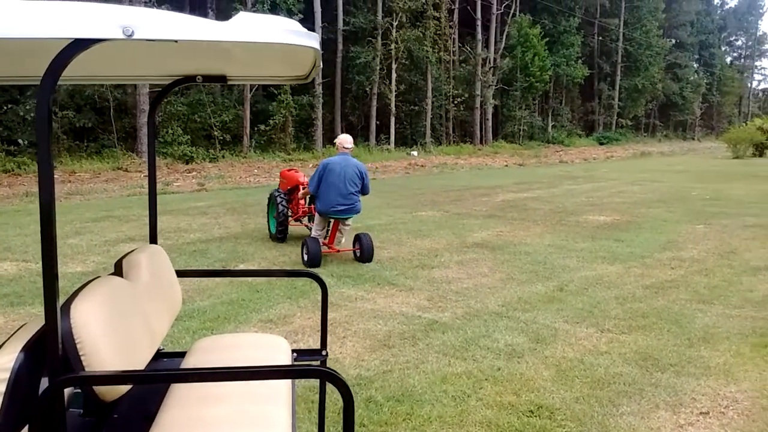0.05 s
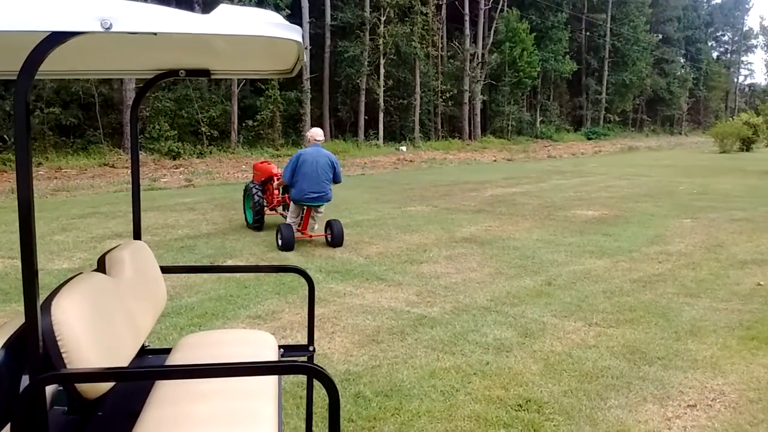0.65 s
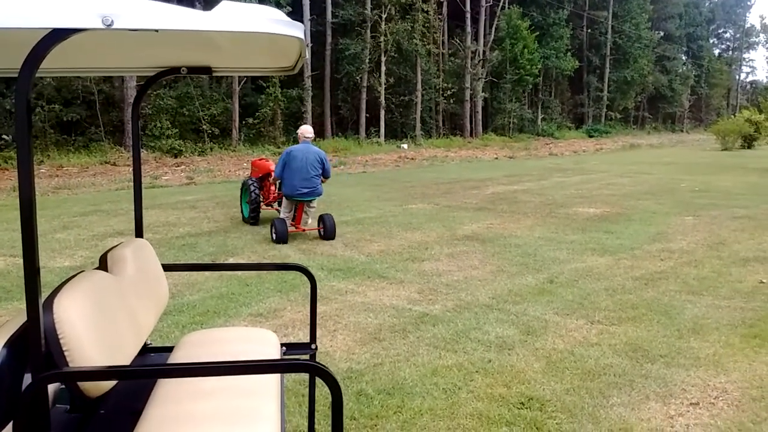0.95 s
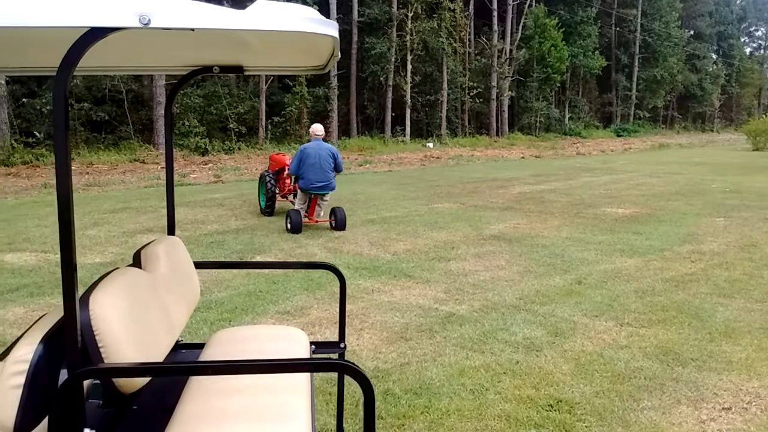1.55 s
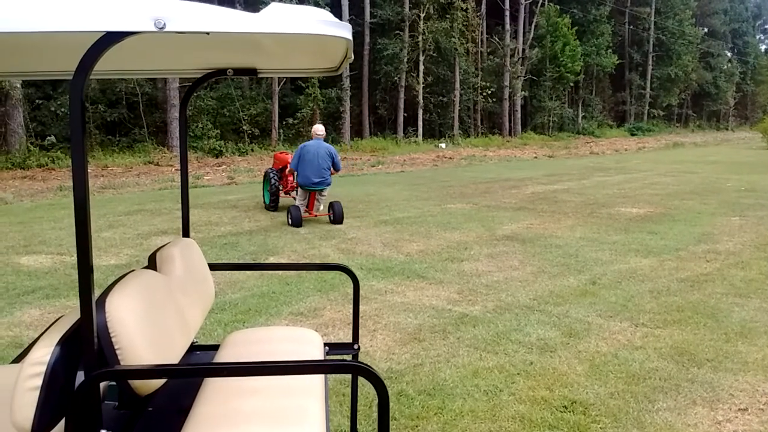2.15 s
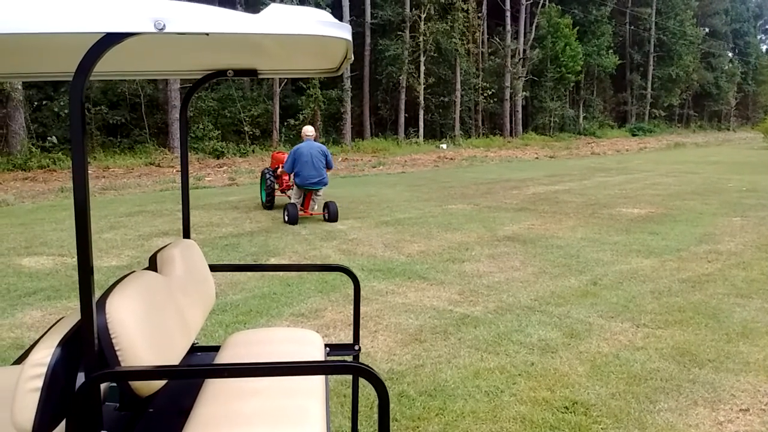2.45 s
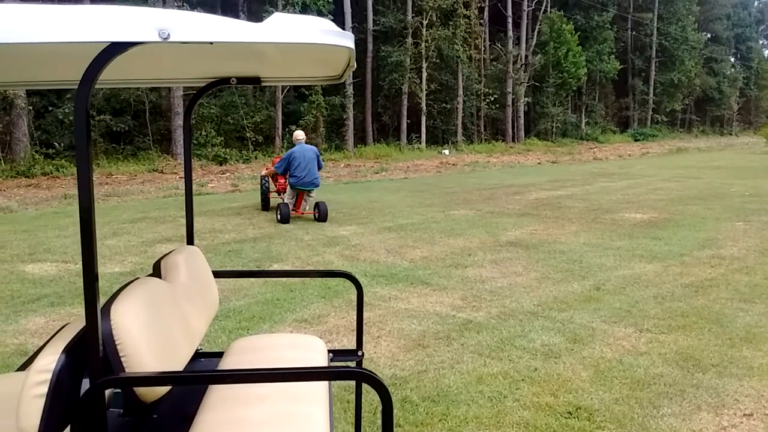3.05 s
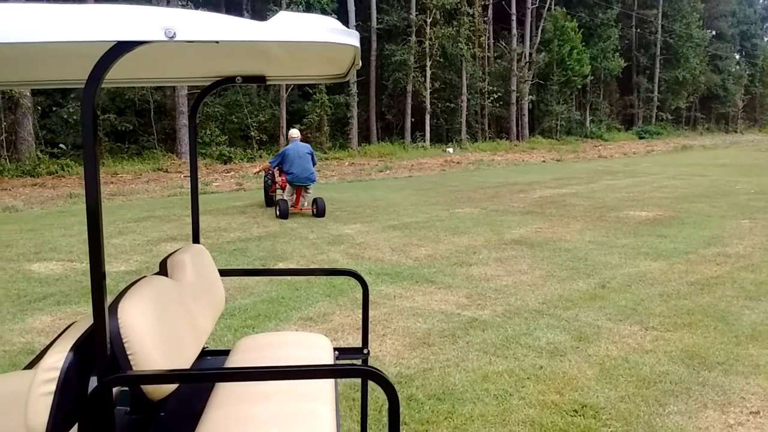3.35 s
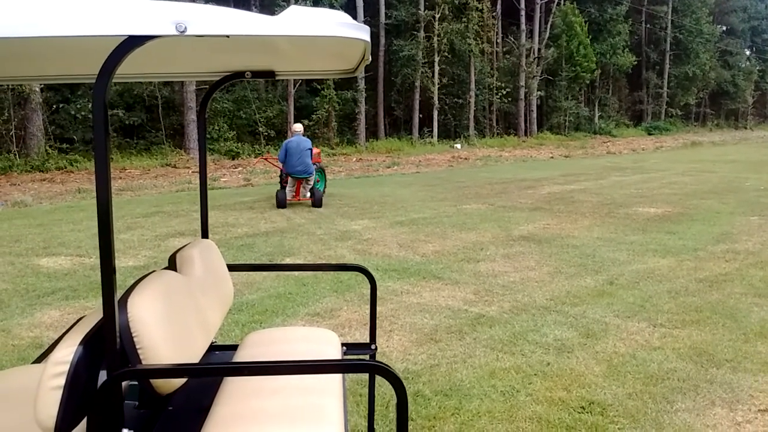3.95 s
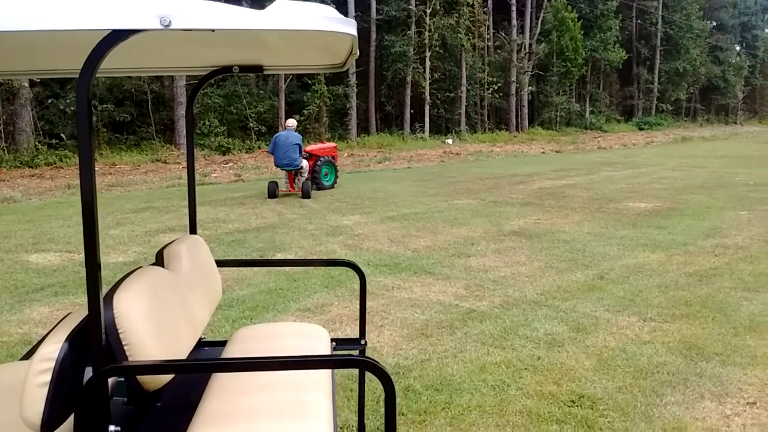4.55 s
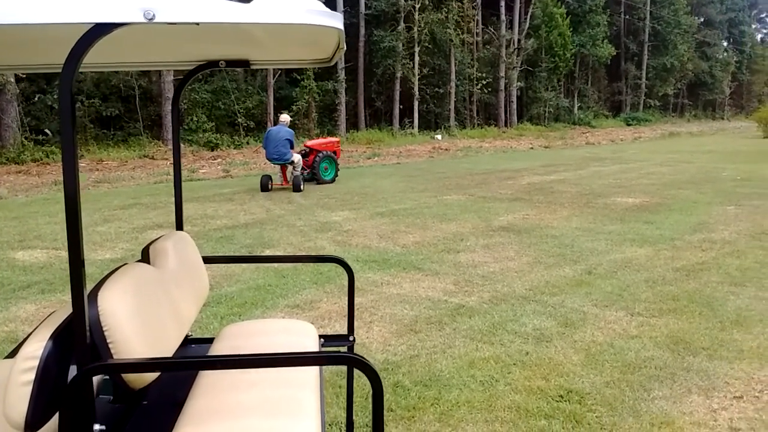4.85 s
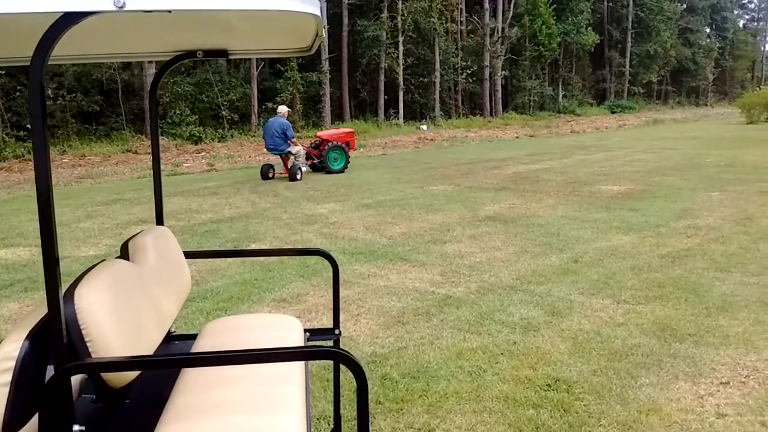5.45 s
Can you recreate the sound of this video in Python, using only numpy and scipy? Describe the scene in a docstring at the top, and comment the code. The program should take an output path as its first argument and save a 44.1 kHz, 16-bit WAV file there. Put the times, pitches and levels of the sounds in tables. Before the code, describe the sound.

The fast, even putter of a small tractor engine runs throughout, low thumps mixed with crisp puffs of exhaust. A fan and gears whir underneath, and sheet metal clinks now and then. The engine speed barely changes, though the tone alters slightly as the machine turns late on. The setting is a grassy field, with a soft wind rumble on the microphone and a dull, faint echo from the woods.

```python
"""Garden tractor on a lawn

A one-cylinder four-stroke chugs away and turns side-on. Each firing sends a thump out of the
muffler, knocks its shell and spits gas in a sharp burst and a softer puff; some jolt loose panels.
Fan and gears whir and rattle underneath. Trees echo faintly and a light breeze rumbles.
The two microphone ports are in opposite polarity in the bass."""
import sys
import numpy as np
from scipy import signal
from scipy.fft import rfft, irfft, next_fast_len
from scipy.io import wavfile

SR = 44100
rng = np.random.default_rng(int(sys.argv[2]) if len(sys.argv) > 2 else 0)


def to_wav(sig):
    """Store sig (one row per channel, or 1-D mono) as 16-bit WAV at the path in sys.argv[1].

    Samples outside -1..1 are clipped; the rate is SR.
    """
    pcm = np.clip(np.atleast_2d(sig), -1, 1) * 32767
    pcm = np.round(pcm).astype(np.int16)
    wavfile.write(sys.argv[1], SR, pcm.T)  # frames by channels


N = 246953
NFFT = next_fast_len(N + SR // 2)
TIME_S = np.arange(N) / SR
FREQ_HZ = np.maximum(np.arange(NFFT // 2 + 1) * SR / NFFT, 1)

# governed engine speed: t/s, firing rate/Hz
FIRING_RATE = [(0.0, 22.055), (0.36, 22.441), (0.76, 21.656), (0.96, 22.715), (1.16, 22.569),
               (1.42, 23.068), (1.74, 22.12), (1.92, 22.599), (2.14, 22.384), (2.5, 23.002), (2.74, 22.436),
               (2.92, 22.516), (3.34, 21.997), (4.0, 23.008), (4.52, 22.908), (4.8, 23.408), (4.94, 22.831),
               (5.6, 22.834)]
# tractor heading: t/s, view (0 from behind, 1 side-on)
HEADING = [(3.5, 0), (4.25, 1)]
# engine pull as the governor opens and closes: t/s, effort/dB
EFFORT = [(0.0, 0.1), (0.6, -0.1), (0.73, -3.0), (0.9, -2.8), (1.37, 1.8), (1.47, -0.8), (2.3, 0.3),
          (2.4, 2.4), (2.83, -0.8), (3.63, 2.4), (4.07, 0.9), (4.33, -2.7), (4.5, -1.0), (4.6, -2.0),
          (4.7, 0.9), (4.9, -3.5), (5.2, 1.7), (5.6, 1.3)]
# exhaust hiss beyond effort: t/s, level/dB
HISS = [(0.0, 0.9), (0.1, 3.5), (1.3, -0.8), (1.4, 1.2), (1.73, 0.0), (1.84, 2.9), (2.27, -0.5),
        (2.53, 1.4), (2.8, -1.5), (2.9, 0.6), (3.0, -2.4), (3.18, -0.8), (3.4, -2.4), (4.3, -2.2),
        (4.8, -.2), (5.6, 0.8)]
# by part: offset/dB, effort slope/(dB/dB), hiss slope/(dB/dB), drift/(dB/s), side-on gain/dB
DRIVE_RESPONSE = {"thump": (.4, .75, -.1, .4, -1.5), "knock": (-.1, 1.05, -.1, .15, -.4),
                  "spit": (-1.6, -.2, 1.4, .2, .4), "whistle": (.1, .2, .7, .1, -.3),
                  "puff": (-.7, .7, .5, .1, .3), "whir": (-.5, .65, .35, -.1, .7)}
# gears taking up load: t/s, level/dB
GEAR_LOAD = [(0, -.2), (.8, -.6), (2.2, -.3), (2.4, .8), (2.8, -.6), (3.3, -.5), (3.55, .8), (3.9, 2.3),
             (4.3, .3), (5.0, .4), (5.35, 1.7), (5.6, .5)]
# fan and gear spectrum: f/Hz, rear level/dB, side-on level/dB
WHIR_SPECTRUM = [(30, -24.4, -22.0), (150, -16.5, -11.6), (400, -26.5, -20.5), (700, -26, -25),
                 (1250, -28.2, -28.0), (1650, -27.3, -27.3), (2600, -29.7, -28.3), (3500, -27.1, -29.5),
                 (4600, -34.5, -35.0), (6700, -35.7, -39.0), (8200, -34.4, -37.7), (9600, -41, -42),
                 (11500, -43.5, -47), (14000, -54, -57), (16000, -66.1, -65.7)]
# gear and chassis rattle spectrum: f/Hz, rear level/dB, side-on level/dB
RATTLE_SPECTRUM = [(400, -38, -40), (1300, -21, -21.5), (2300, -21, -20.5), (3300, -29, -29),
                   (4000, -24, -24), (4400, -23, -19), (4900, -29, -26), (6500, -35, -33), (8400, -29, -28),
                   (11000, -34, -33), (16000, -57, -56)]
# muffler and pipe modes: f/Hz, t60/s, level/dB
MUFFLER_MODES = [(298, .08, -31), (345, .05, -31), (390, .03, -28), (510, .04, -27), (560, .04, -32),
                 (618, .05, -32), (772, .06, -39), (895, .045, -32), (965, .04, -38), (1065, .06, -34),
                 (1150, .007, -30.5), (1258, .07, -45), (1550, .07, -42), (1672, .07, -40),
                 (2245, .06, -43)]
# drop in the whistle: t/s, level/dB
WHISTLE_FADE = [(2.55, .8), (2.68, -4.8)]
# valve burst spectrum: f/Hz, rear level/dB, side-on level/dB
SPIT_SPECTRUM = [(700, -22.1, -21.0), (1600, -18.5, -16.5), (2400, -13.1, -17.5), (3200, -12.8, -8.8),
                 (3800, -12, -13.1), (4600, -17.5, -17.5), (5700, -18.7, -18.4), (6600, -27.5, -20),
                 (7400, -20.3, -20.4), (9700, -26.5, -24.2), (11000, -25.7, -23.2), (12500, -35.1, -32.4),
                 (14000, -36.5, -37), (16000, -52, -47)]
# treble flare in the turn: t/s, level/dB
TREBLE_FLARE = [(0, -45), (3.7, -40), (3.9, -21.5), (4.15, -17.5), (4.33, -24), (4.47, -22), (4.72, -22),
                (4.95, -33), (5.6, -32)]
# harder firings: t/s, extra spit/dB, extra whistle/dB
HARD_FIRINGS = [(.05, 2, 2), (.095, 2, 2), (.32, 1, 4.5), (.364, 1, 4), (.41, 1, 5), (.453, 1, 5),
                (.635, 1.5, -1), (.68, 2.5, .5), (.863, 1.5, 4), (.997, 1.5, 5), (1.13, 2, 4.5),
                (1.174, 1.5, 4), (1.437, 4, 5), (1.613, 1, 2), (1.926, 1, 4.5), (2.455, 1, 3.5),
                (1.97, 1, 4), (2.013, 1.5, 3), (2.41, 1, 4.5), (2.544, 2, 5), (3.121, 1, 5), (3.483, 1, 5),
                (3.528, 3, 1), (3.969, 2, 3), (4.143, 1, 5), (4.187, 3, 7), (4.23, -1, 5), (4.534, 3, 1),
                (4.837, 6, 3), (5.319, 2.5, 4)]
# exhaust pulse spectrum: f/Hz, rear level/dB, side-on level/dB
THUMP_SPECTRUM = [(22, 8.4, 10.3), (45, 17.5, 20.1), (66, 13.5, 15.8), (90, 32.5, 30.6), (113, 37.8, 35.3),
                  (158, 37.7, 39.9), (204, 34.1, 38.2), (228, 30.5, 33.6), (255, 18.8, 22.6), (330, 0, 0)]
# muffler chambers: f/Hz, width/Hz, share (negative opposes the thump)
CHAMBERS = [(96, 40, .14), (178, 24, -.22)]
# exhaust stroke spectrum: f/Hz, rear level/dB, side-on level/dB
PUFF_SPECTRUM = [(300, -32.3, -32.3), (500, -21.0, -21.6), (900, -23.0, -21.1), (1300, -22.7, -20.9),
                 (1650, -18.6, -17.9), (2700, -20.2, -20.5), (3600, -19.4, -16.9), (4600, -26.6, -23.1),
                 (6800, -33.0, -26.9), (8200, -19.6, -22.7), (9600, -32.8, -28.5), (11000, -33.5, -31.6),
                 (14500, -44.7, -42.8), (16000, -59.4, -49.6)]
# sheet metal clanks: t/s, level/dB, f/Hz, width/Hz
CLANKS = [(.051, -9, 3690, 250), (.096, -4, 3730, 280), (.23, -10, 3370, 350), (.636, -12, 4700, 1150),
          (.681, -13, 4700, 1150), (.682, -7, 3600, 200), (1.395, -15, 3000, 700), (1.438, -12, 3330, 200),
          (1.838, -11, 4300, 800), (1.883, -15, 3000, 900), (2.06, -11, 3400, 300), (2.195, -15, 4200, 700),
          (2.283, -14, 3000, 150), (2.414, -13, 2480, 150), (2.502, -13, 2480, 150),
          (2.545, -11, 2890, 400), (2.856, -15, 4400, 300), (2.9, -15, 4350, 300), (3.078, -10, 3000, 130),
          (3.215, -12, 4450, 130), (3.258, -12, 4450, 160), (3.35, -15, 4400, 300), (4.45, -13, 4350, 110),
          (4.536, -10, 4400, 150), (4.58, -11, 4400, 100), (4.668, -12, 3400, 350), (4.711, -11, 3690, 200),
          (4.796, -13, 3090, 180), (4.839, -8, 3730, 250), (4.883, -11, 3090, 160), (5.057, -9, 3650, 300),
          (5.101, -12, 3370, 200), (5.145, -13, 3330, 200), (5.275, -16, 3400, 900), (5.32, -13, 3170, 200),
          (5.364, -11, 3130, 200), (5.408, -14, 4400, 900), (5.497, -13, 4800, 1150),
          (5.54, -16, 4400, 1150)]
# hood and casing resonances: f/Hz, width/Hz, lift/dB in views 0, 1, 2
CASING_MODES = [(770, 40, 5.5, 6, 3), (905, 70, 4.5, 5, 3), (1075, 70, .5, 4, 5.5), (1262, 45, 7, 4, 5),
                (1555, 60, 4, 6, 3), (1676, 55, 5.5, 6.5, 6.5), (1900, 200, -1, .3, 2), (2245, 70, 3, 4, 1),
                (2400, 160, 4.5, 4.5, 3.5), (2680, 150, -4, -.5, 2.5), (2940, 150, 5, 3, 3),
                (3200, 300, 1.5, 2, 4.5), (3550, 250, 3, 2, 1.5), (3860, 160, 5, 1, 2.5),
                (4100, 150, -3, -.5, -2.5), (4420, 260, .3, 2, 1.5), (4750, 200, 2.3, 1, -.5),
                (5650, 350, 3, 3, 3), (6200, 300, -.3, -2.5, 1.5), (6750, 450, -.3, 2.5, 2),
                (7500, 600, -3, -.3, 2), (8880, 300, 2.5, 3, 2.5), (9600, 800, -4, .3, 1.5),
                (10900, 900, 3, 3, 2.5)]
# heading for the casing's ring: t/s, view (0 angled left, 1 straight away, 2 side-on)
CASING_VIEW = [(2.55, 0), (2.75, 1), (3.75, 1), (4.2, 2)]
# microphone ports, tractor from behind: f/Hz, left minus right/dB, left lead/rad, coherence
PORTS_BEHIND = [(60, 0.9, 3.1, 0.999), (250, 0.5, 3.1, 0.998), (420, 0.0, 3.15, 0.994),
                (600, -0.3, 3.06, 0.98), (770, -4.2, 3.22, 0.91), (1080, -3.8, 3.05, 0.8),
                (1260, -7.8, 5.82, 0.66), (1650, 2.0, 5.62, 0.87), (2000, 5.4, 5.03, 0.49),
                (2250, 9.0, 4.62, 0.54), (2850, 3.6, 3.36, 0.88), (3350, 0.4, 3.22, 0.96),
                (3700, -3.0, 3.23, 0.86), (3920, -9.2, 2.0, 0.54), (4300, -0.4, -0.07, 0.78),
                (4800, 3.9, -0.26, 0.78), (5300, 4.5, -0.61, 0.31), (5750, 6.9, -1.22, 0.61),
                (6500, 0.2, -2.9, 0.76), (7100, -4.6, -1.57, 0.27), (7800, -5.0, -0.19, 0.78),
                (8700, -2.8, -0.05, 0.83), (9500, -0.8, -2.58, 0.12), (10400, -4.4, -5.52, 0.07),
                (11000, -2.8, -4.24, 0.66), (12000, -0.6, -6.6, 0.26), (12600, 0.1, -6.34, 0.89),
                (15000, 1.2, -6.18, 0.33)]
# microphone ports, tractor side-on: f/Hz, left minus right/dB, left lead/rad, coherence
PORTS_SIDE_ON = [(60, 0.9, 3.08, 0.998), (250, 0.5, 3.09, 0.999), (420, 0.1, 3.14, 0.99),
                 (600, 0.1, 3.0, 0.97), (770, -1.9, 3.21, 0.87), (1080, -3.0, 2.85, 0.86),
                 (1260, -8.5, 5.29, 0.38), (1650, 1.6, 5.58, 0.85), (2000, 5.2, 4.74, 0.44),
                 (2300, 5.6, 4.01, 0.33), (2850, 2.4, 3.27, 0.91), (3450, 0.1, 3.17, 0.97),
                 (3800, -2.6, 2.74, 0.85), (4050, -4.5, 0.46, 0.27), (4350, -1.3, -0.22, 0.86),
                 (4800, 4.3, -0.14, 0.72), (5100, 4.2, 0.8, 0.09), (5500, 4.8, -2.18, 0.68),
                 (6400, 1.0, -3.01, 0.95), (7100, -2.0, -2.66, 0.78), (7600, -8.1, -2.02, 0.33),
                 (8100, -5.3, -0.6, 0.79), (8900, 1.5, -0.94, 0.71), (9600, -1.8, -1.78, 0.8),
                 (10700, -7.6, -2.68, 0.18), (11400, -0.9, -5.16, 0.83), (12300, -0.5, -5.09, 0.18),
                 (15000, 0.1, -6.31, 0.75)]


def undb(db):
    """Decibels to gain."""
    return 10 ** (np.asarray(db) / 20)


def curve(table):
    """Breakpoints joined linearly in time."""
    return np.interp(TIME_S, *np.transpose(table))


def spectra(table):
    """Each column interpolated over log frequency."""
    hz, *columns = np.transpose(table)
    return [np.interp(np.log(FREQ_HZ), np.log(hz), column) for column in columns]


def filtered(x, response):
    """Apply a frequency response."""
    return irfft(rfft(x, NFFT) * response, NFFT)[..., :N]


def lowpass(hz, order):
    """Zero-phase low-pass response."""
    return 1 / (1 + (FREQ_HZ / hz) ** order)


def band(hz, half_width_hz, order=4):
    """Zero-phase band-pass response."""
    return 1 / (1 + ((FREQ_HZ - hz) / half_width_hz) ** order)


def radiate(x, table):
    """Blend rear and side-on spectra by heading."""
    side_on = curve(HEADING)
    rear, flank = (filtered(x, undb(db)) for db in spectra(table))
    return (1 - side_on) * rear + side_on * flank


def pulses(times_s, scatter_db):
    """Impulses of random strength."""
    gains = undb(scatter_db * rng.standard_normal(len(times_s)))
    inside = (times_s >= 0) & (times_s < TIME_S[-1])
    return np.bincount((times_s[inside] * SR).astype(int), gains[inside], N)


def bursts(times_s, rise_s, fall_s, scatter_db):
    """Envelope peaking at each time: Gaussian rise, exponential fall."""
    t = np.arange(-SR // 20, SR // 20) / SR
    shape = np.exp(-(np.minimum(t, 0) / rise_s) ** 2 / 2 - np.maximum(t, 0) / fall_s)
    return signal.fftconvolve(pulses(times_s, scatter_db), shape, "same")


def turbulence():
    """Rushing air in two rows: direct and scattered."""
    return rng.standard_normal((2, N))


def firing_times(first_cycles=.23):
    """One exhaust pulse per engine cycle."""
    cycles = np.cumsum(curve(FIRING_RATE)) / SR - first_cycles
    return np.interp(np.arange(int(cycles[-1]) + 1), cycles, TIME_S)


def drive_db(part):
    """A part's level follows effort, hiss, a slow drift and the turn."""
    offset_db, per_effort, per_hiss, drift_db_per_s, side_on_db = DRIVE_RESPONSE[part]
    engine_db = per_effort * curve(EFFORT) + per_hiss * curve(HISS)
    drift_and_turn_db = drift_db_per_s * (TIME_S - TIME_S.mean()) + side_on_db * curve(HEADING)
    return offset_db + engine_db + drift_and_turn_db


def hard_firings_db(width_s=.015):
    """Extra spit and whistle around each hard firing."""
    return sum(np.outer(extra_db, np.exp(-((TIME_S - at_s) / width_s) ** 2))
               for at_s, *extra_db in HARD_FIRINGS)


def whir(firings_s, throb=.3, gain_db=-4.3, shelf_hz=260, shelf_db=-1.2):
    """Fan and gears run on, swelling a little after each firing."""
    swell = 1 + throb * bursts(firings_s, rise_s=.004, fall_s=.02, scatter_db=3)
    shelf = undb(shelf_db * lowpass(shelf_hz, 4))
    return undb(gain_db) * filtered(radiate(swell * turbulence(), WHIR_SPECTRUM), shelf)


def rattle(rate_hz=120, gain_db=-9.5):
    """Gears and loose fittings tick at random as the wheels roll."""
    ticks_s = rng.uniform(0, TIME_S[-1], int(rate_hz * TIME_S[-1]))
    gate = bursts(ticks_s, rise_s=.0005, fall_s=.002, scatter_db=2.2)
    return undb(gain_db) * radiate(gate * turbulence(), RATTLE_SPECTRUM)


def breeze(gain_db=-32.5, corner_hz=150, gust_db=1.2, knots=20):
    """Light air rumbles on each port separately."""
    gust = np.interp(TIME_S, np.linspace(0, TIME_S[-1], knots), rng.standard_normal(knots))
    rumble = filtered(rng.standard_normal((2, N)), undb(gain_db) / (1 + 1j * FREQ_HZ / corner_hz))
    return rumble * undb(gust_db * gust)


def knock(firings_s, valve_lead_s=.0078, lag_s=.0007, bass_lag_s=.0013, jitter_s=.00015,
          turn_lag_s=.0011, turn_db=-2.5, spread_db=2.2):
    """The muffler rings softly as the valve opens, then hard as the gas slug hits, low modes last."""
    valve = filtered(pulses(firings_s - valve_lead_s, scatter_db=1.5), lowpass(680, 4))
    # side-on, the blow comes round the hood later and weaker
    late_s = lag_s + turn_lag_s * np.interp(firings_s, *np.transpose(HEADING))
    late_s += jitter_s * rng.standard_normal(len(firings_s))
    blow = pulses(firings_s + late_s, scatter_db=.9) * undb(turn_db * curve(HEADING))
    bass = lowpass(700, 8)
    bass_delay = 1 - bass + bass * np.exp(-2j * np.pi * FREQ_HZ * bass_lag_s)
    push = filtered(blow, bass_delay) + valve
    # each blow favours other modes
    shares = undb(spread_db * rng.standard_normal((len(firings_s), len(MUFFLER_MODES)))).T
    t, out = TIME_S[:SR // 5], 0
    for (hz, t60_s, db), share in zip(MUFFLER_MODES, shares):
        ring = undb(db - 60 * t / t60_s) * np.sin(2 * np.pi * hz * t)
        out += signal.oaconvolve(push * np.interp(TIME_S, firings_s, share), ring)[:N]
    return out


def whistle(firings_s, lead_s=.0044, again_s=.0076, again_db=-9, sustain_db=-25, gain_db=-10.6):
    """The jet sings on the outlet's edge with the spit, again with the puff, faintly in between."""
    first = bursts(firings_s - lead_s, rise_s=.0013, fall_s=.0024, scatter_db=.8)
    again = bursts(firings_s - lead_s + again_s, rise_s=.001, fall_s=.002, scatter_db=1.5)
    gate = first + undb(again_db) * again + undb(sustain_db)
    return undb(gain_db) * filtered(gate * turbulence(), band(hz=8260, half_width_hz=480, order=2))


def spit(firings_s, lead_s=.0042, gain_db=-3.2):
    """Gas at full pressure bursts past the opening exhaust valve."""
    gas = bursts(firings_s - lead_s, rise_s=.0013, fall_s=.0034, scatter_db=1.2) * turbulence()
    flare = filtered(gas * undb(curve(TREBLE_FLARE)), band(hz=10600, half_width_hz=3500))
    return undb(gain_db) * radiate(gas, SPIT_SPECTRUM) + flare


def thump(firings_s, muffler_hz=310, lag_s=.0003, skew_rad=-.45, gain_db=1.8,
          turn_lag_s=.001, turn_skew_rad=-.95):
    """The muffler smooths each gas slug into one deep pressure swing; its chambers hum on."""
    # side-on, the swing comes later and rebounds further
    late_s = lag_s + turn_lag_s * np.interp(firings_s, *np.transpose(HEADING))
    phase_rad = skew_rad + turn_skew_rad * curve(HEADING)
    swing = radiate(-pulses(firings_s + late_s, scatter_db=.55), THUMP_SPECTRUM)
    skewed = np.real(signal.hilbert(swing, NFFT)[:N] * np.exp(-1j * phase_rad))
    chambers = 1 + sum(share / (1 + 2j * (FREQ_HZ - hz) / width_hz) for hz, width_hz, share in CHAMBERS)
    return undb(gain_db) * filtered(skewed, chambers * lowpass(muffler_hz, 10))


def bark(firings_s, lag_s=.0012, pipe_hz=820, pipe_db=-23, low_hz=150, low_db=-5.5):
    """Tail pipe eddies give each firing a hoarse bark."""
    gate = bursts(firings_s + lag_s, rise_s=.004, fall_s=.009, scatter_db=1.0)
    pipe = undb(pipe_db) * band(pipe_hz, half_width_hz=350)
    low_hump = undb(low_db) / (1 + 6 * np.log2(FREQ_HZ / low_hz) ** 2)
    return filtered(gate * turbulence(), pipe + low_hump * lowpass(pipe_hz, 4))


def puff(firings_s, lag_s=.0029, gain_db=-2.1):
    """The piston pushes out the remaining gas, softer and longer."""
    gate = bursts(firings_s + lag_s, rise_s=.002, fall_s=.006, scatter_db=1.0)
    return undb(gain_db) * radiate(gate * turbulence(), PUFF_SPECTRUM)


def chuff(firings_s, lag_s=.005, gain_db=-16):
    """Gas tumbles hollowly through the baffles after each blow."""
    gate = bursts(firings_s + lag_s, rise_s=.003, fall_s=.012, scatter_db=2.5)
    return undb(gain_db) * filtered(gate * turbulence(), band(hz=410, half_width_hz=140))


def burble(firings_s, lag_s=.008, hz=155, gain_db=-9):
    """Gas sloshes unevenly in the muffler between thumps."""
    gate = bursts(firings_s + lag_s, rise_s=.004, fall_s=.03, scatter_db=2.5)
    hump = undb(gain_db) / (1 + (1.6 * np.log2(FREQ_HZ / hz)) ** 4)
    return filtered(gate * rng.standard_normal(N), hump)


def clanks(decay_s=.005, gain_db=-4, length=4096):
    """Firings jolt loose sheet metal: a broad clank, or one panel's narrow ring."""
    out = np.zeros((2, N + length))
    bins_hz = np.fft.rfftfreq(length, 1 / SR)
    for at_s, db, hz, width_hz in CLANKS:
        shake = rng.standard_normal((2, length)) * np.exp(-TIME_S[:length] / decay_s)
        detune = 1j * (bins_hz - hz) / width_hz
        panel = undb(gain_db + db) / (1 + np.sqrt(2) * detune + detune ** 2)
        start = int(at_s * SR)
        out[:, start:start + length] += irfft(rfft(shake) * panel)
    return out[:, :N]


def recolour(x, firings_s, spread_db=1.3, span_hz=(900, 10000), bands=7):
    """Each band takes a new random level every firing."""
    position = np.interp(np.log(FREQ_HZ), np.log(span_hz), [0, bands - 1])
    gains = undb(spread_db * rng.standard_normal((len(firings_s), bands))).T
    return sum(filtered(x, np.clip(1 - np.abs(position - k), 0, 1)) * np.interp(TIME_S, firings_s, gain)
               for k, gain in enumerate(gains))


def casing(x):
    """Hood and casing ring with the noise; the turn brings other resonances to face the listener."""
    facing, out = curve(CASING_VIEW), 0
    hz, width_hz, *views = np.transpose(CASING_MODES)
    bells = 1 / (1 + 2j * (FREQ_HZ - hz[:, None]) / width_hz[:, None])
    for view, lifts_db in enumerate(views):
        response = np.prod(1 + (undb(lifts_db)[:, None] - 1) * bells, axis=0)
        weight = np.clip(1 - np.abs(facing - view), 0, 1)
        out += weight * filtered(x, response)
    return out


def canopy(x, gain_db=-14, decay_s=.008, highpass_hz=700, count=14):
    """Roof and struts of a cart by the microphone add close reflections above the bass."""
    lags_s = rng.uniform(.001, .02, count)
    gains = rng.choice([-1, 1], count) * np.exp(-lags_s / decay_s)
    taps = np.bincount((lags_s * SR).astype(int), gains / np.linalg.norm(gains))
    return undb(gain_db) * filtered(x, rfft(taps, NFFT) / (1 + (highpass_hz / FREQ_HZ) ** 2))


def tree_line(x, delay_s=.19, t60_s=.7, gain_db=-27, corner_hz=3000):
    """Trunks at the wood's edge scatter back a faint, dull echo."""
    t = TIME_S[:SR] - delay_s
    tail = rng.standard_normal(SR) * (t > 0) * undb(-60 * np.abs(t) / t60_s)
    echo = signal.fftconvolve(x, tail[None] / np.linalg.norm(tail))[:, :N]
    return filtered(echo, undb(gain_db) / (1 + 1j * FREQ_HZ / corner_hz))


def ports(body, rush, table):
    """Each port has its own level and phase; the rush is only partly coherent between them."""
    balance_db, lead_rad, coherence = spectra(table)
    shared, scattered = filtered(rush, np.sqrt(np.array([1 + coherence, 1 - coherence]) / 2))
    left, right = undb(balance_db / 2), undb(-balance_db / 2)
    norm = np.sqrt((left ** 2 + right ** 2) / 2)
    return np.array([filtered(body + shared + scattered, left / norm),
                     filtered(body + shared - scattered, right / norm * np.exp(-1j * lead_rad))])


def scene(jet_db=-1.3, rush_db=-.6, shadow_db=-1.5, bark_growth=1.6):
    """One firing sequence drives the engine; the outlet is shadowed once side-on."""
    firings_s, side_on = firing_times(), curve(HEADING)
    hard_spit_db, hard_whistle_db = hard_firings_db()
    spit_db = drive_db("spit") + hard_spit_db
    whistle_db = drive_db("whistle") + hard_whistle_db + curve(WHISTLE_FADE)
    knock_db = drive_db("knock")

    body = undb(drive_db("thump")) * (thump(firings_s) + burble(firings_s))
    body += undb(knock_db) * knock(firings_s)
    jet = undb(spit_db) * spit(firings_s) + undb(whistle_db) * whistle(firings_s)
    gas = recolour(undb(jet_db) * jet + undb(drive_db("puff")) * puff(firings_s), firings_s)
    eddies = undb(bark_growth * knock_db) * bark(firings_s)
    gears = undb(drive_db("whir") + curve(GEAR_LOAD)) * (whir(firings_s) + rattle())
    baffles = undb(knock_db) * chuff(firings_s)
    rush = undb(rush_db + shadow_db * side_on) * (gas + eddies + gears + baffles)

    engine = np.vstack([body, casing(rush + clanks())])  # rows: body, direct rush, scattered rush
    field = engine + canopy(engine) + tree_line(engine)
    rear, flank = (ports(field[0], field[1:], table) for table in (PORTS_BEHIND, PORTS_SIDE_ON))
    return (1 - side_on) * rear + side_on * flank + breeze()


def record(dry, cutoff_hz=15800):
    """Steep elliptic low-pass."""
    return signal.sosfilt(signal.ellip(8, .2, 70, cutoff_hz, fs=SR, output="sos"), dry)


dry = scene()
out = record(dry)
to_wav(out)
```